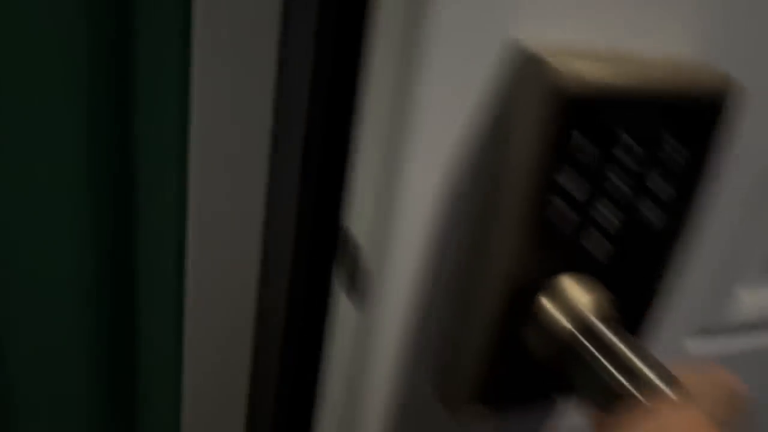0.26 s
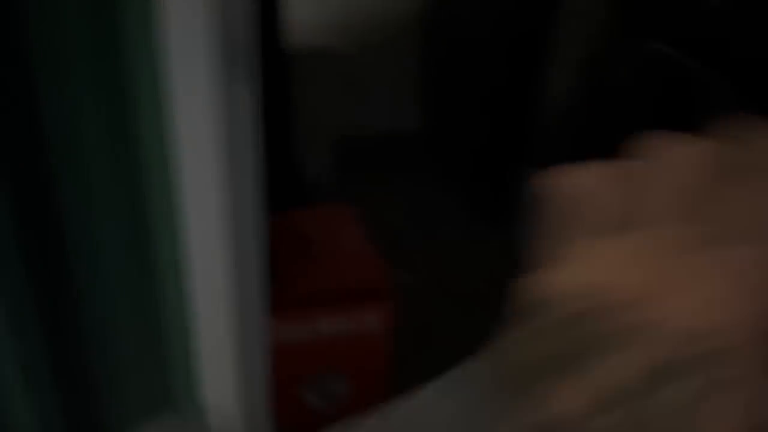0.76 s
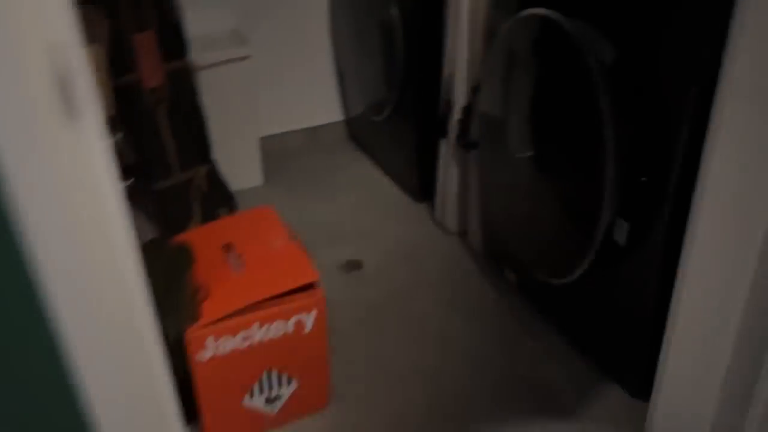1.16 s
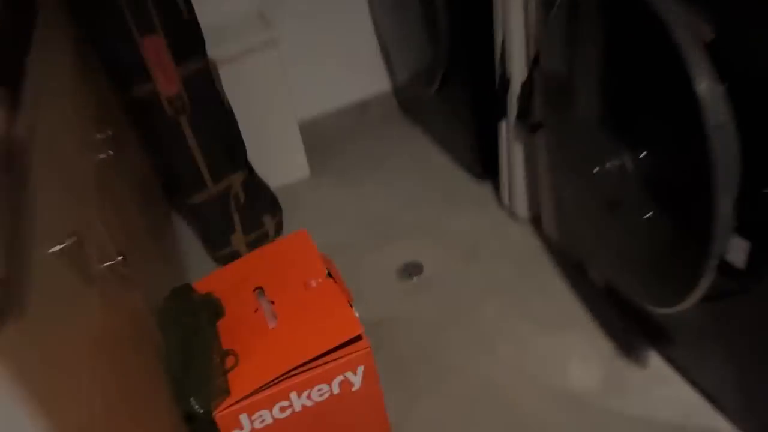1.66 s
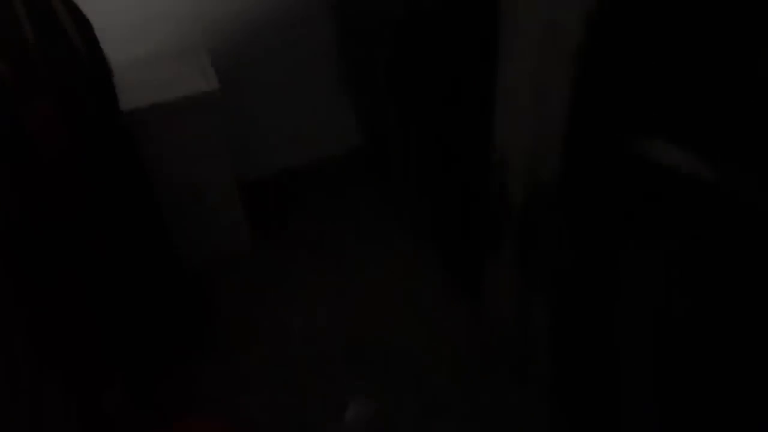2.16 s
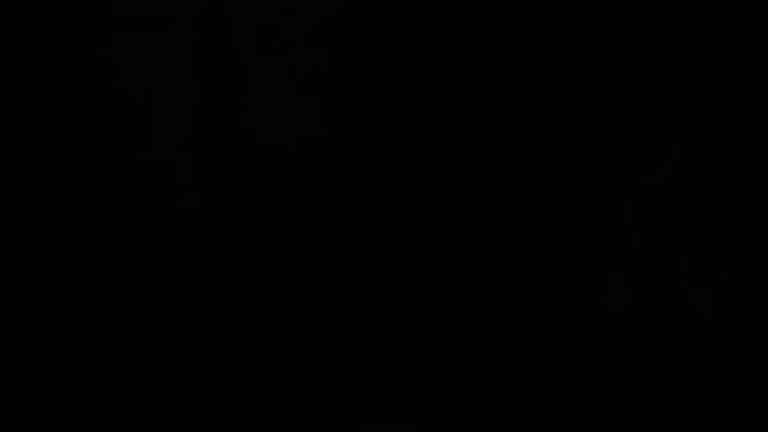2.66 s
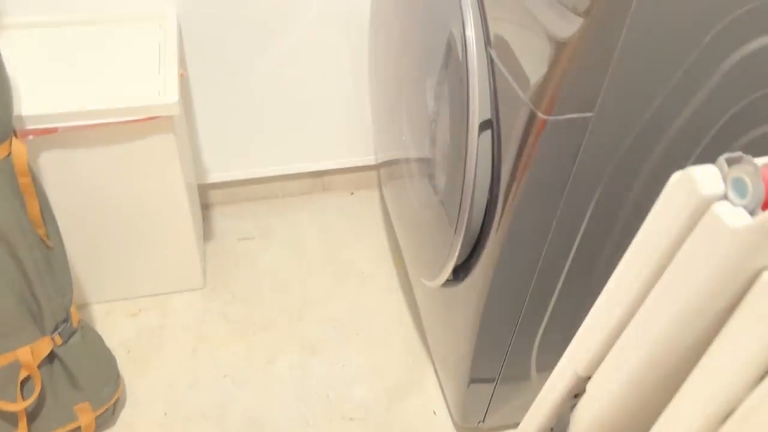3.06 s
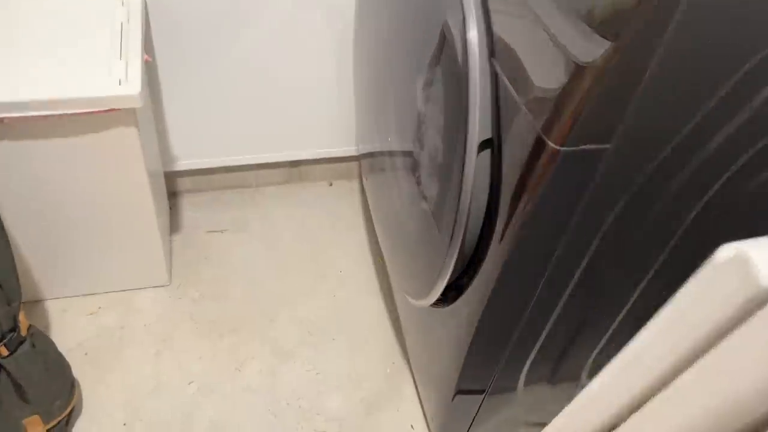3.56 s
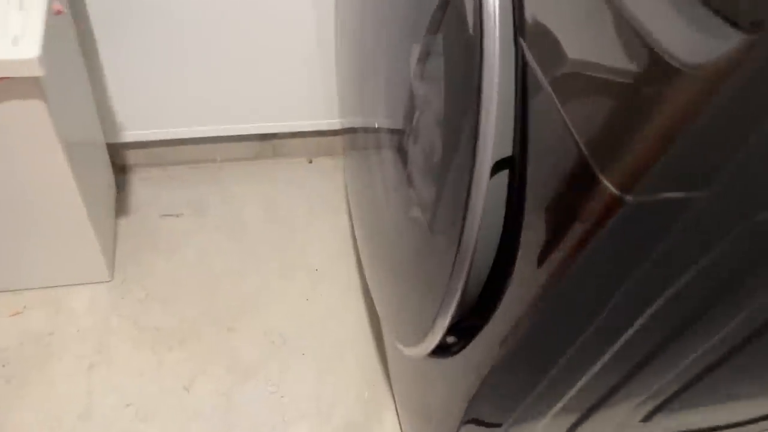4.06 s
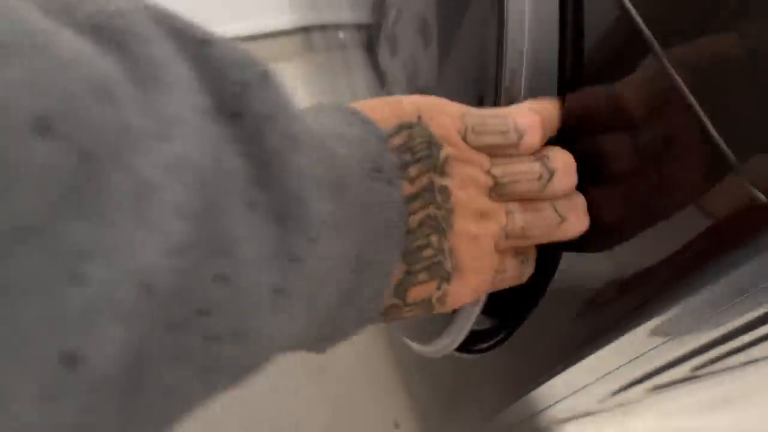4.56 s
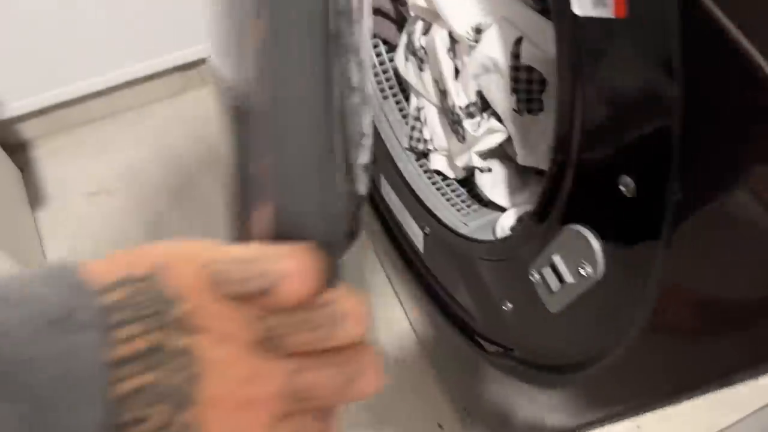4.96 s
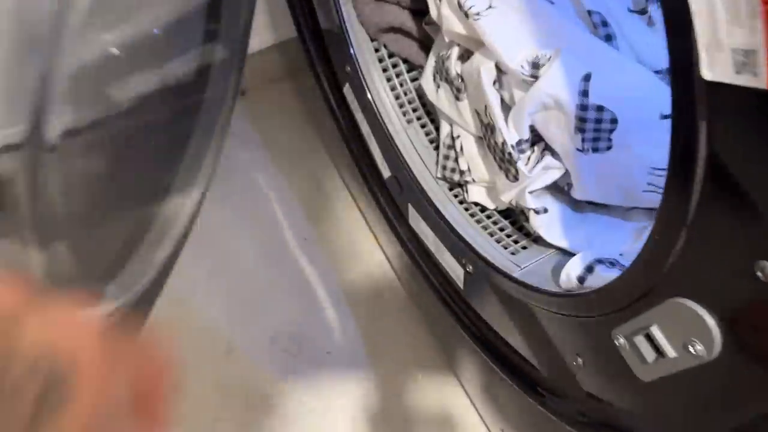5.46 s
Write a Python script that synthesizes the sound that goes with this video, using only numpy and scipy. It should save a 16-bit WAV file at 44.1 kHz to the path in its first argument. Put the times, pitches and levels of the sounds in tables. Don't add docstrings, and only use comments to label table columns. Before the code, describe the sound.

A small hard-walled laundry room, heard in close stereo from a handheld phone. Low bumps and light scuffing begin at once; around 0.4-0.6 s a lever latch clatters open with packed clicks, dull blows, scrape and thin metal ticks. Soft low thuds of someone stepping in follow to 0.9 s, then a quieter gap. Muffled steps and small knocks come at 1.4-1.9 s, with faint sliding after 2.1 s. At about 2.5 s the door moves, and at 2.64-2.71 s it knocks shut and bounces quickly in its frame. A scuff follows at 3.04 s, a rubber squeak at 3.19 s, then a heavy stamp near 3.43 s booms in the floor and rattles sheet metal amid cloth hiss. A short chirp sounds at 4.0 s. Low bumps and small clicks from 4.5 s lead to a sharp, bright dryer-catch snap at 4.73 s with a brief echo. Faint rustling and a small tick near 5.5 s end it.

```python
import sys
import numpy as np
from scipy import signal
from scipy.fft import rfft, irfft
from scipy.io import wavfile
from scipy.ndimage import uniform_filter1d

SR = 44100
rng = np.random.default_rng(int(sys.argv[2]) if len(sys.argv) > 2 else 0)


def to_wav(sig):
    pcm = np.clip(np.atleast_2d(sig), -1, 1) * 32767
    pcm = np.round(pcm).astype(np.int16)
    wavfile.write(sys.argv[1], SR, pcm.T)


def voltage_ratio(decibels):
    exponent = np.asarray(decibels, float) / 20
    return 10 ** exponent


N = 251370
T = np.arange(N) / SR
HZ = np.fft.rfftfreq(N, 1 / SR) + 1

# [f/Hz, level/dB per Hz]
AIR_COLOUR = [(18, -33), (30, -10.5), (59, -2.5), (220, -28.5), (281, -28.5), (333, -52.5), (641, -40),
              (690, -44.5), (10000, -70), (13000, -100), (22000, -120)]
# [f/Hz, level/dB per Hz]
SCRAPE_COLOUR = [(350, -10), (600, -2.5), (777, -3.5), (824, -3.5), (900, -2.5), (1660, -3.5), (3500, -17),
                 (4550, -71), (7700, -120)]
# [f/Hz, level/dB per Hz]
SWISH_COLOUR = [(1410, -8.5), (2400, 2), (2820, 0), (4030, 1), (7340, 1), (8410, -2), (10500, -5),
                (13600, -55), (22000, -120)]
# [t/s, swish/dB, scrape/dB, fade/s per 20 dB]
SCUFFS = [(0.397, -57, -40, 0.08), (0.412, -56, -49, 0.08), (0.432, -39, -34, 0.01),
          (0.525, -53, -33, 0.135), (0.553, -59, -47, 0.15), (1.76, -57, -46, 0.23), (2.26, -47, -50, .1),
          (2.537, -49, -59, 0.22), (3.042, -50, -40.5, .12), (3.188, -35.5, -31.5, 0.11),
          (3.898, -51, -61, .5), (3.999, -38.5, -38.5, 0.1446), (4.732, -25.5, -22, 0.0744),
          (5.184, -55, -57, 0.1), (5.528, -47.5, -53.5, 0.35)]
# [peak t/s, swish/dB, scrape/dB, swell/s, fade/s per 20 dB]
SLIDES = [(0.026, -34.5, -42.5, 0.12, 0.041), (0.505, -41, -29, .09, 0.03), (0.59, -47, -34, 0.11, 0.052),
          (1.71, -51, -56, 0.11, 0.081), (2.12, -62, -53, .06, .2), (2.21, -60, -53, .1, .1),
          (2.32, -41.5, -49, 0.13, 0.15), (2.5, -52.5, -50, 0.045, 0.11), (2.67, -48, -38, 0.032, 0.2),
          (2.75, -50.5, -46, 0.13, .1), (2.802, -38.5, -43.5, 0.057, .15), (3.07, -52, -36, .1, 0.11),
          (3.367, -42, -59, 0.091, 0.16), (3.393, -45, -29, .008, .1), (3.425, -37, -22, 0.05, .1),
          (3.63, -56, -45, .1, .16), (3.487, -41, -33, .12, 0.093), (4.075, -43.5, -62, 0.17, 0.078),
          (4.525, -53, -50, 0.16, .5), (4.62, -58, -46, 0.069, .1), (4.725, -52, -29, .012, .02),
          (4.93, -59.5, -55, .3, .12), (5.3, -47.5, -56.5, 0.091, 0.28), (5.46, -49, -78, 0.23, .12)]
# [t/s, peak level/dB, ring f/Hz, t60/s]
THUDS = [(0.057, -21, 73, 0.087), (0.177, -21, 83.4, 0.054), (0.4175, -10, 100, 0.12),
         (0.4385, -11, 175, 0.07), (0.4535, -11, 90, .08), (0.4665, -14, 140, .05), (0.474, -7, 135, 0.05),
         (0.649, -19.5, 81.6, 0.051), (0.684, -22, 73.4, 0.13), (0.741, -31, 71, 0.14),
         (0.784, -23.5, 72, 0.085), (0.901, -30, 72, 0.14), (1.4225, -20, 130, 0.17),
         (1.4745, -25, 135, 0.25), (1.612, -30, 116.6, 0.14), (1.835, -23, 105, 0.14),
         (1.892, -24, 235, 0.08), (2.114, -38.5, 182, 0.081), (2.479, -31.5, 237, 0.069),
         (2.5, -20, 94.4, 0.11), (3.043, -24, 236.5, 0.12), (4.584, -36, 300, .05), (4.615, -32, 330, .05),
         (1.754, -30, 300, .05), (1.82, -23, 210, .08), (1.853, -25, 170, .07), (2.27, -40, 331, .05),
         (2.182, -46, 312, .05), (4.464, -26.5, 71, 0.12), (4.508, -23.5, 74, 0.064),
         (4.744, -23, 163, 0.051), (5.558, -37, 72.3, 0.12)]
# [peak t/s, boom/dB, swell/s, fade/s, both per 20 dB]
WEIGHT = [(0.086, -28, 0.13, 0.11), (0.481, -24, 0.093, 0.041), (0.70, -35.5, .17, 0.29),
          (0.95, -44.5, 0.53, 0.059), (1.213, -56, .2, 0.073), (1.46, -43, 0.054, 0.32),
          (1.88, -40, .35, 0.1), (2.08, -46, .1, .1), (2.298, -46, .07, 0.13), (2.48, -39, .015, .3),
          (2.593, -31, 0.13, .15), (2.67, -31, .1, 0.27), (3.0, -38.5, 0.16, .2), (3.322, -19, 0.19, 0.14),
          (3.5, -25, .1, .2), (3.66, -28, .4, 0.16), (4.2, -52, .2, .1), (3.95, -40, .6, .12),
          (4.49, -30, 0.06, 0.079), (4.63, -44, .05, .6), (4.735, -39, .015, .3), (4.81, -35, .2, .15),
          (5.05, -54, 0.48, .35), (5.58, -50, .1, .1), (5.7, -51, 0.13, .1)]
# [f/Hz, width/Hz, level/dB]
FLOORBOARDS = [(42, 12, -3.5), (65.2, 21, -4)]
# [f/Hz, width/Hz, level/dB]
PANELS = [(95.4, 23, -0.5), (131, 33, -3.5), (187, 39, -3.5)]
# [t/s, f/Hz]
LEADING_PANEL = [(0, 89.13), (.41, 125.2), (.58, 87.7), (1.049, 112), (1.4, 129), (2.25, 92.15),
                 (2.636, 127), (3.3, 92.3), (4.6, 107.8)]
# [f/Hz, width/Hz, level/dB]
FITTINGS = [(248, 58, 1.5), (340.6, 130, 0), (463.4, 102, -4.5), (584, 143, -10), (800, 340, -16.5)]
# [t/s, panel/dB, rattle/dB, fade/s per 20 dB]
KNOCKS = [
    (0.42, -26.5, -39, .2),
    (1.408, -46, -42, 0.05),
    (2.478, -37, -42.5, 0.16),
    (2.615, -40, -60, 0.5),
    (2.643, -30, -30, 0.1),
    (4.731, -30, -38, 0.25),
]
# [peak t/s, panel/dB, rattle/dB, swell/s, fade/s per 20 dB]
PUSHES = [(0.1, -36, -41, 0.36, 0.14), (0.268, -46, -47.5, 0.064, 0.23), (0.40, -44, -45, .015, .1),
          (0.478, -27, -27, 0.1, 0.075), (0.62, -37, -38, 0.32, 0.16), (1.56, -46, -58, 0.23, .2),
          (1.80, -36, -42, 0.14, 0.14), (1.9, -38, -47, .12, 0.031), (2.3, -49, -56, 0.061, .12),
          (2.531, -36, -60, 0.076, 0.07), (2.675, -28, -32, 0.039, .13), (3.086, -31, -37, 0.085, 0.19),
          (3.36, -51, -45.5, 0.46, .05), (3.44, -28, -23, 0.062, .1), (3.524, -29, -39, 0.16, .18),
          (3.69, -43, -49, .2, 0.064), (3.95, -55, -72, .1, 0.091), (4.04, -51, -50, .05, 0.16),
          (4.49, -42, -53, .08, .11), (4.625, -31.5, -38, 0.054, 0.11), (4.82, -34, -40, 0.31, 0.077),
          (5.0, -51, -65, .3, .4), (5.58, -60, -58.5, .05, .4)]
# [t/s, peak level/dB, ring f/Hz, t60/s, fizz relative to
# ring/dB]
CLICKS = [(0.088, -25, 984, 0.028, -40), (0.397, -28, 1360, 0.012, -17), (0.4312, -21, 2950, 0.008, -8),
          (0.432, -20, 1200, .012, -20), (0.438, -24, 2900, 0.007, -10), (0.4467, -19, 1900, 0.014, -14),
          (0.451, -18, 950, 0.014, -20), (0.462, -22, 1900, 0.016, -14), (0.47, -28.5, 1840, 0.019, -3.5),
          (0.4892, -12, 1490, 0.012, -16), (0.4925, -14, 2600, 0.009, -12), (0.503, -17, 1650, 0.025, -25),
          (0.5165, -21, 1350, .012, -20), (0.606, -30, 1700, .012, -12), (1.611, -43, 1690, 0.025, -23),
          (1.756, -39, 1566, 0.027, -16), (3.016, -36, 971, 0.025, -24), (4.518, -44, 2500, 0.015, -9),
          (4.527, -38, 1800, .03, -25), (4.538, -40, 1850, .03, -25), (4.597, -40, 1000, .015, -20),
          (4.632, -22, 900, 0.018, -34), (4.6315, -31, 2330, .013, -20), (4.643, -32, 1560, 0.02, -25),
          (5.574, -40, 825, 0.068, -8),
          (0.406, -26.5, 2994, 0.01, -13), (0.413, -27.5, 2120, 0.0054, 5),
         (0.5432, -16.5, 1590, 0.0096, -13.5), (0.5647, -19.5, 2130, 0.01, -3.5),
         (0.5779, -20, 1500, 0.009, -16), (0.578, -24, 3600, .012, -16), (0.7955, -34, 2650, 0.012, -12),
         (0.796, -33, 4100, .012, -5), (4.273, -59, 6550, 0.02, 8.5), (5.5285, -40, 4450, 0.01, 2)]
OVERTONES = [(1, 0.81), (1.6, 0.41), (2.6, 0.37)]
# [f/Hz, level/dB, t60/s]
DOOR = [(81, -8, .25), (129, -3, .45), (183, -7, .15), (253, 3, .14), (307, -4, .12), (398, -13, .1),
        (468, -13, .14), (598, -11, .14), (720, -18, .08), (856, -17, .09), (969, -23, .1),
        (1125, -18, .08)]
# [t/s, level/dB, push/s]
SLAMS = [
    (2.6385, -19, .0008),
    (2.6525, -22, .0015),
    (2.6635, -19, .002),
    (2.676, -23, .001),
    (2.71, -30, .003),
]
# [peak t/s, level/dB, swell/s, fade/s per 20 dB]
BRUSHES = [(2.7, -52, .1, .15), (3.21, -46, .02, .15), (3.36, -47, .06, .15), (3.43, -41, .08, .1),
           (3.47, -46, .03, .1)]
# [f/Hz, width/Hz, level/dB]
CLOTH = [(6400, 3000, 0)]
# [t/s, f/Hz, level/dB]
SQUEAKS = [
    [(3.186, 1778, -36), (3.2, 1803, -26), (3.323, 1883, -53.5), (3.38, 1900, -55)],
    [(3.995, 1984, -54), (4.001, 1967, -30), (4.017, 1952, -29.5), (4.059, 1950, -52), (4.2, 1950, -65),
     (4.37, 1953, -67)],
]
# [f/Hz, level/dB, t60/s]
CABINET = [(178, -8, .12), (242, -3, .12), (371, 0, .1), (431, -4, .1), (533, -3, .12), (571, -2, .14),
           (700, -9, .09), (770, -10, .09), (991, -6, .08), (1077, -6, .08)]
# [t/s, level/dB, push/s]
JOLTS = [(3.389, -32, .001), (3.408, -29, .001), (3.427, -26, .001), (3.447, -27, .001), (3.466, -30, .001),
         (3.5, -35, .002)]
# [f/Hz, level/dB, t60/s]
JOISTS = [(53.6, 0, .36)]
# [t/s, level/dB, push/s]
STAMPS = [
    (3.41, -18, .003),
    (3.429, -9, .003),
    (3.448, -12, .003),
]
# [f/Hz, level/dB, t60/s]
SNAP = [(2140, 0, 0.0084), (1464, -13, 0.014), (3620, -7, 0.0062), (5580, -17.5, 0.01)]
# [f/Hz, level/dB, t60/s]
CRACK = (3470, 10.4, 0.0013)
# [t/s, level/dB]
STIR = [(0, 5), (.5, 1), (2.2, -0.5), (2.45, 0), (2.98, -11), (3.17, -14), (3.6, -12), (3.74, -21.5),
        (3.89, -17), (3.897, -3.5), (4.4, -5.5), (4.95, -6.5), (5.04, -20.5), (5.175, -12.5), (5.185, -3.5),
        (5.7, -1.5)]
REST_DB = {"boom": -69.5, "panel": -59.5, "rattle": -58, "swish": -59.5, "scrape": -54}
# [f/Hz, t60/s, echo level/dB]
ROOM = [(145.6, 0.3, -26), (630, 0.29, -12.5), (1986, 0.36, -9), (5170, 0.42, -16), (10000, 0.06, -8.5)]
# [f/Hz, likeness 0-1]
LIKENESS = [(40, 1), (80, 0.8), (150, 0.6), (300, 0.63), (600, 0.4), (1500, 0.12), (3000, 0.1),
            (6000, 0.44), (9000, 0.98), (16000, 1)]
# [f/Hz, phase/rad]
LEAD = [(0, 0), (1460, -.8), (2500, 1), (6630, .9), (7410, 1.5), (8270, .4), (9730, -2.5), (10250, -3.14),
        (13900, -9.42), (17550, -15.7)]
# [f/Hz, level/dB]
TILT = [(60, 0.5), (110, 0.0), (200, -0.5), (380, 0.5), (700, 0.5), (1290, 0.5), (2380, -0.5), (4400, 4.0),
        (8120, 1.5), (15000, 0.0)]


def unit(x):
    return x / np.sqrt(np.mean(x ** 2))


def along(table):
    hz, value = np.transpose(table)
    return np.interp(np.log(HZ), np.log(np.maximum(hz, 1)), value)


def noise(gain):
    return unit(irfft(rfft(rng.standard_normal(N)) * gain, N))


def resonant(modes):
    return sum(voltage_ratio(db) / (1 + ((HZ - hz ** 2 / HZ) / width) ** 2) for hz, width, db in modes)


def flicker(rate_hz, depth_db):
    return unit(voltage_ratio(depth_db * noise(1 / (1 + (HZ / rate_hz) ** 2))))


def curves(table):
    s, *columns = np.transpose(table)
    return [np.interp(T, s, column) for column in columns]


def add(out, s, sound):
    i = int(s * SR)
    out[i:i + len(sound)] += sound[:len(out) - i]


def ring(hz, t60, rise_s):
    t = T[:int(1.2 * t60 * SR)]
    return np.sin(2 * np.pi * hz * t) * voltage_ratio(-60 * t / t60) * (1 - np.exp(-t / rise_s))


def swells(rows, rest_db):
    step = 64
    t = T[::step]
    s, db, swell, fade = np.array(list(rows)).T[:, :, None]
    rising = (np.abs(s - t) / swell) ** 1.28
    below = np.where(t < s, rising, (t - s) / fade)
    power = voltage_ratio(2 * rest_db[::step]) + voltage_ratio(2 * (db - 20 * below)).sum(axis=0)
    return np.interp(T, t, np.sqrt(power))


def contacts(sudden, slow):
    return np.transpose([(s, a, b, 0.0064, fade) for s, a, b, fade in sudden] + slow)


def rest(name, murky=0):
    inside = np.clip((T - 2) / 0.2, 0, 1)
    return REST_DB[name] + curves(STIR)[0] - 6.5 * murky * inside


def struck(modes, blows):
    flex = 0.035
    out = np.zeros(N)
    for k, (s, db, push_s) in enumerate(blows):
        for m, (hz, mode_db, t60) in enumerate(modes):
            bent_hz = hz * (1 + flex * np.sin(m * (2 * k + 1)))
            sign = (-1) ** (m * (k + 1) // 2)
            add(out, s, sign * voltage_ratio(db + mode_db) * ring(bent_hz, t60, push_s))
    return out


def air():
    return voltage_ratio(-70) * noise(voltage_ratio(along(AIR_COLOUR)))


def rub():
    s, swish_db, scrape_db, swell, fade = contacts(SCUFFS, SLIDES)
    sheen_db = swish_db - 11 - 0.66 * np.maximum(scrape_db - swish_db, 0)
    grain = flicker(43, 1.2)
    scrape = voltage_ratio(-1.0) * noise(voltage_ratio(along(SCRAPE_COLOUR))) * flicker(60, 2.32)
    swish = voltage_ratio(1.0) * noise(voltage_ratio(along(SWISH_COLOUR))) * flicker(200, 0.57)
    top = resonant([(10700, 8900, 19.5), (15000, 2500, -23)])
    sheen = voltage_ratio(5.5) * noise(top) * flicker(300, 2.2)
    scrape_gain = swells(zip(s, scrape_db, swell, 1.337 * fade), rest("scrape", 1))
    swish_gain = swells(zip(s, swish_db, swell, fade), rest("swish"))
    sheen_gain = swells(zip(s, sheen_db, swell, 0.78 * fade), rest("swish") - 24.5)
    return scrape_gain * scrape + grain * (swish_gain * swish + sheen_gain * sheen)


def thuds():
    out = np.zeros(N)
    for s, db, hz, t60 in THUDS:
        add(out, s, voltage_ratio(db - 2.5) * ring(hz, t60, 0.0034))
        add(out, s, voltage_ratio(db - 10.0) * ring(1.763 * hz, 0.4 * t60, 0.0016))
    return out


def shake(phase):
    s, panel_db, rattle_db, swell, fade = contacts(KNOCKS, PUSHES)
    since, hz = np.transpose(LEADING_PANEL)
    panel_hz = hz[np.clip(np.searchsorted(since, T) - 1, 0, None)]
    floor_tone = np.sin(2 * np.pi * 53.55 * T + phase)
    boom = 1.34 * floor_tone + 0.55 * noise(resonant(FLOORBOARDS))
    panel_tone = np.sin(2 * np.pi * np.cumsum(panel_hz) / SR + phase)
    panel = (0.78 * panel_tone + 0.71 * noise(resonant(PANELS))) * flicker(30, 4.2)
    rattle = noise(resonant(FITTINGS)) * flicker(27, 2.73)
    boom_gain = voltage_ratio(-1.5) * swells(WEIGHT, rest("boom"))
    panel_gain = voltage_ratio(-1.5) * swells(zip(s, panel_db, swell, fade), rest("panel"))
    rattle_gain = swells(zip(s, rattle_db, swell, 1.03 * fade), rest("rattle", 1))
    return boom_gain * boom + panel_gain * panel + rattle_gain * rattle


def clicks():
    out = np.zeros(N)
    fizz = noise(resonant([(8450, 3400, 0.12), (14000, 13000, -6)]))
    grit = noise(resonant([(2020, 1400, 0)]))
    for s, db, hz, t60, fizz_db in CLICKS:
        i = int(s * SR)
        t60 = min(t60, 0.04)
        hard = voltage_ratio(0.45 * fizz_db)
        tone = sum(share * hard ** (ratio - 1) * ring(ratio * hz, t60, 0.0013)
                   for ratio, share in OVERTONES)
        t = T[:len(tone)]
        fade = voltage_ratio(-52 * t / t60) * (1 - np.exp(-t / 0.00041))
        rough = 0.5 * voltage_ratio(0.27 * fizz_db) * grit[i:i + len(t)]
        rough = rough + 1.21 * voltage_ratio(fizz_db) * fizz[i:i + len(t)]
        add(out, s, voltage_ratio(db + 0.5) * (1.42 * tone + fade * rough))
    return out


def door_slam():
    return struck(DOOR, SLAMS)


def brush():
    return swells(BRUSHES, np.full(N, -120.0)) * noise(resonant(CLOTH))


def squeaks():
    out = np.zeros(N)
    waver = noise(1 / (1 + (HZ / 350) ** 2))
    throb = flicker(160, 4.8)
    for table in SQUEAKS:
        hz, db = curves(table)
        on = uniform_filter1d(1. * (T > table[0][0]) * (T < table[-1][0]), size=200)
        turns = np.cumsum(hz * (1 + 0.085 * waver)) / SR
        out += on * voltage_ratio(db + 1.5) * throb * np.sin(2 * np.pi * turns)
    return out


def cabinet_jolt():
    return struck(CABINET, JOLTS)


def stamp():
    return struck(JOISTS, STAMPS)


def catch():
    start_s, level_db = 4.729, 2.8
    snap, crack = np.zeros((2, N))
    for hz, db, t60 in SNAP:
        add(snap, start_s, voltage_ratio(level_db + db) * ring(hz, t60, 0.00021))
    hz, db, t60 = CRACK
    add(crack, start_s, voltage_ratio(db) * ring(hz, t60, 0.00005))
    return snap, crack


def room(x):
    tails = np.zeros((2, SR // 2))
    t = T[:SR // 2]
    for hz, t60, db in ROOM:
        for tail in tails:
            band = noise(resonant([(hz, 1.03 * hz, 0)]))[:len(t)]
            band = band * voltage_ratio(-60 * t / t60) * (1 - np.exp(-t / 0.001))
            add(tail, 0, voltage_ratio(db) * band / np.sqrt(np.sum(band ** 2)))
    return [signal.fftconvolve(x, tail)[:N] for tail in tails]


def steady(phase):
    return air() + rub() + shake(phase)


def scene():
    thud = thuds() + door_slam() + cabinet_jolt()
    tick = clicks()
    squeak = squeaks()
    snap, crack = catch()
    shared, apart = rfft(steady(0)), rfft(steady(np.pi / 2))
    near, far = (rfft(tail) for tail in room(thud + 0.5 * tick + 0.43 * squeak + crack))
    same = np.clip(along(LIKENESS), 0, 1)
    direct = rfft(thud + tick + squeak + snap + brush() + stamp())
    mid = direct + (shared + near) * np.sqrt((1 + same) / 2)
    bounce = rfft(0.38 * thud + 0.28 * snap) * np.exp(-2j * np.pi * HZ * 0.0038)
    side = bounce + (apart + far) * np.sqrt((1 - same) / 2)
    hz, lead = np.transpose(LEAD)
    port = voltage_ratio(along(TILT) / 2) * np.exp(0.5j * np.interp(HZ, hz, lead))
    left, right = (mid + side) * port, (mid - side) / port
    return np.array([irfft(left, N), irfft(right, N)])


def band_limit(x):
    return signal.sosfilt(signal.butter(12, 17090, fs=SR, output="sos"), x)


def record(dry):
    wet = signal.sosfilt(signal.butter(2, 33, "high", fs=SR, output="sos"), dry)
    wet = np.tanh(0.82 * wet) / 0.78
    wet = signal.sosfilt(signal.ellip(6, 0.3, 30, 15950, fs=SR, output="sos"), wet)
    return band_limit(wet)


dry = scene()
out = record(dry)
to_wav(out)
```